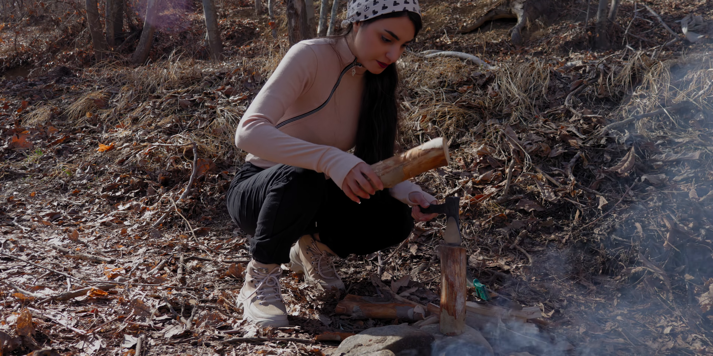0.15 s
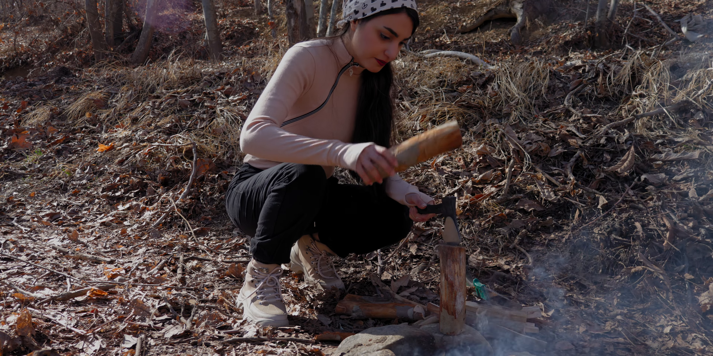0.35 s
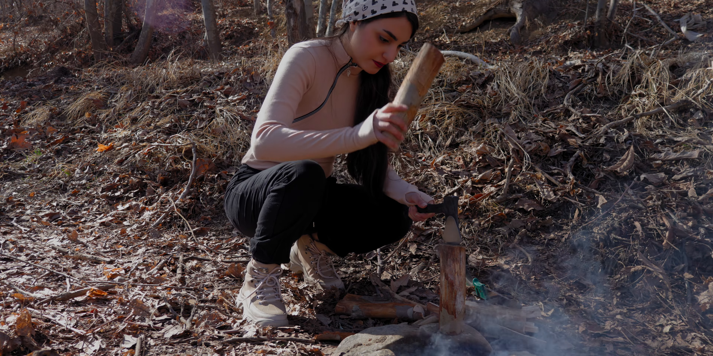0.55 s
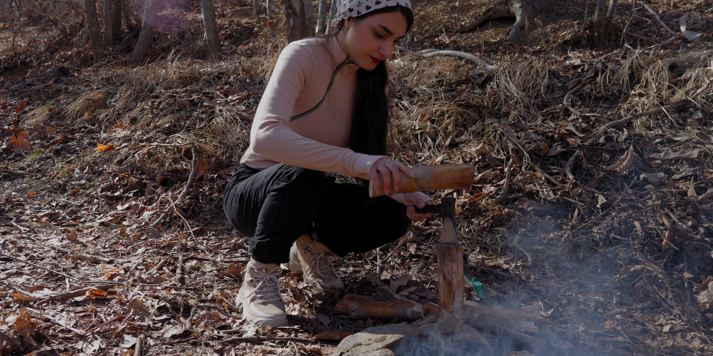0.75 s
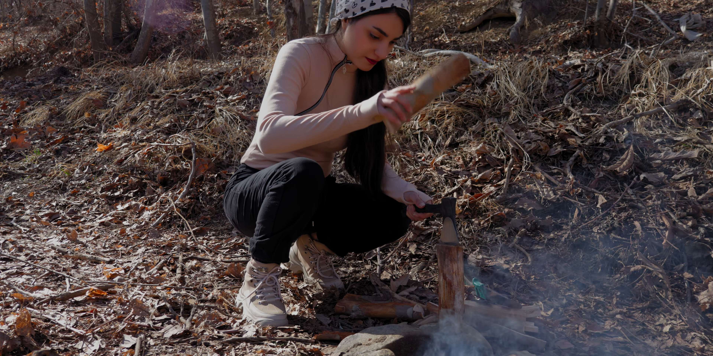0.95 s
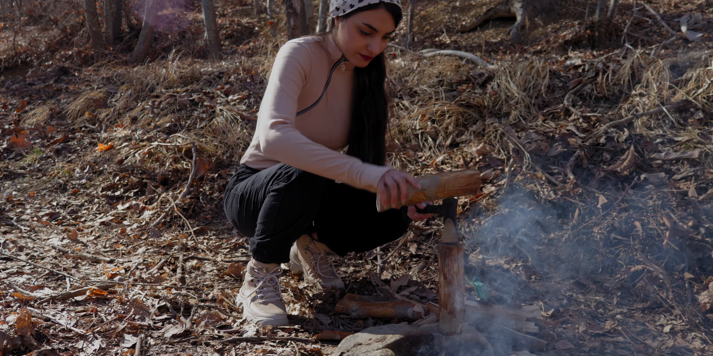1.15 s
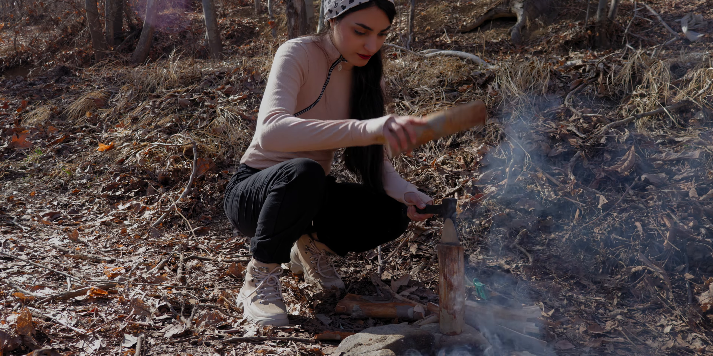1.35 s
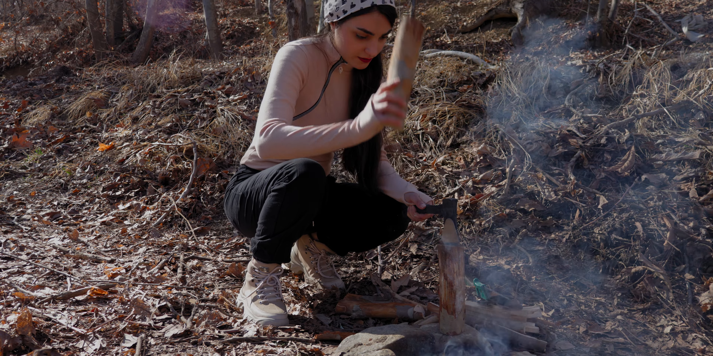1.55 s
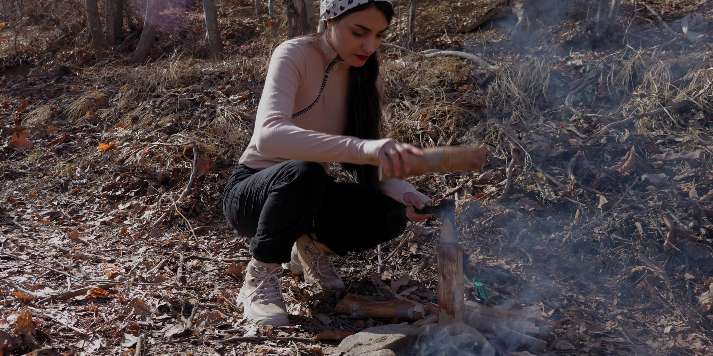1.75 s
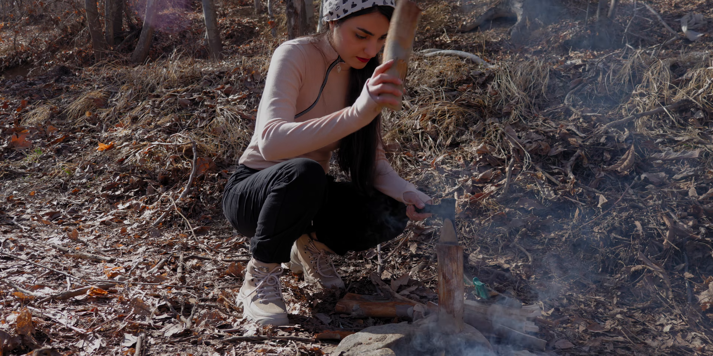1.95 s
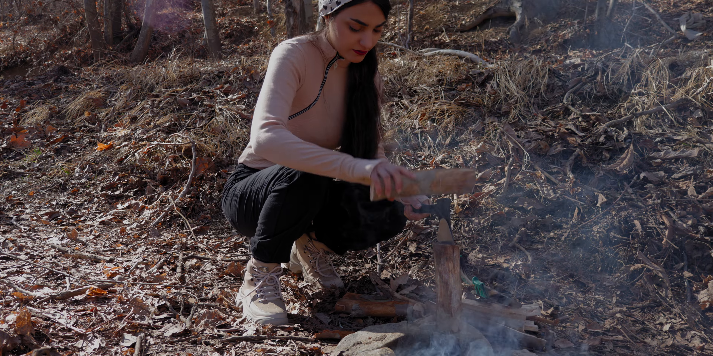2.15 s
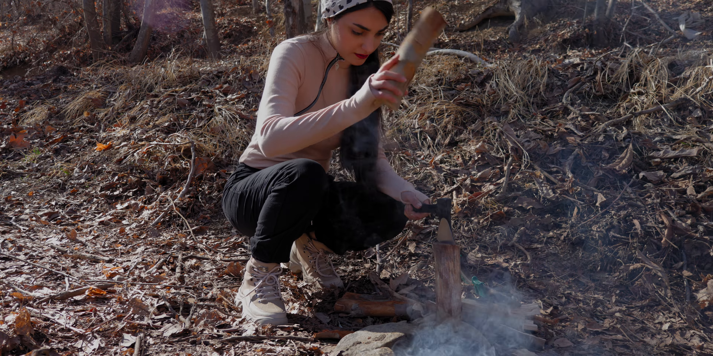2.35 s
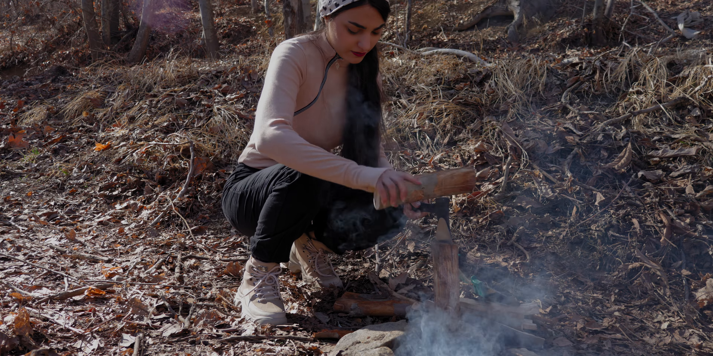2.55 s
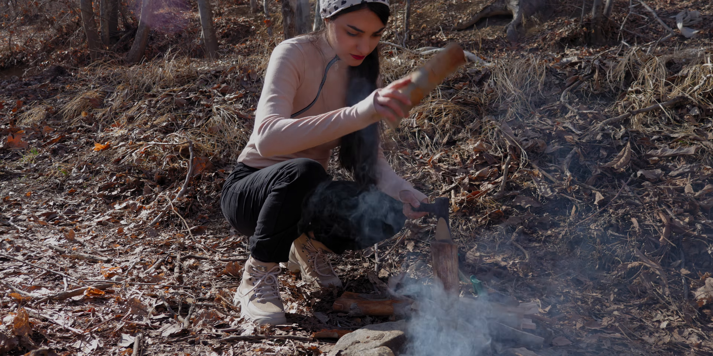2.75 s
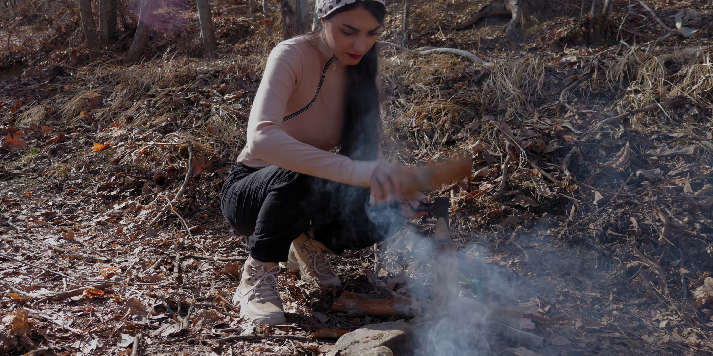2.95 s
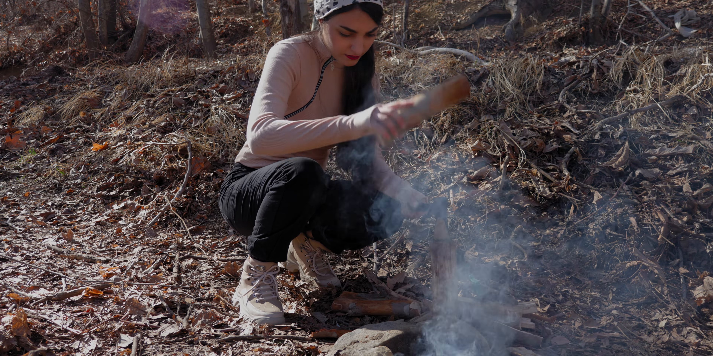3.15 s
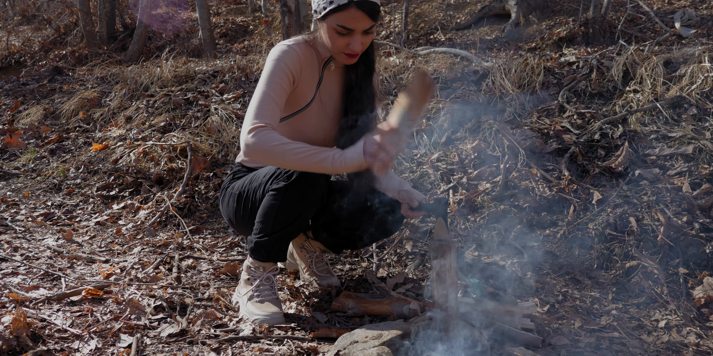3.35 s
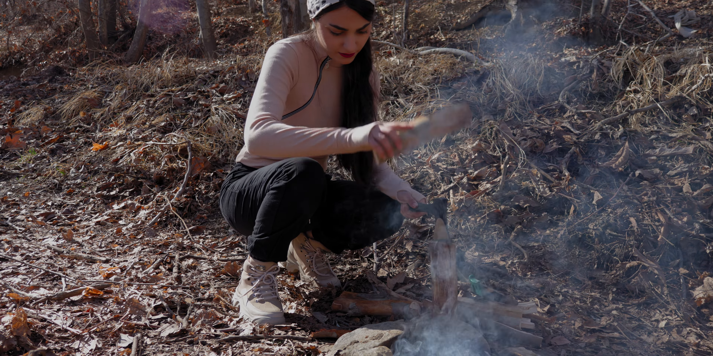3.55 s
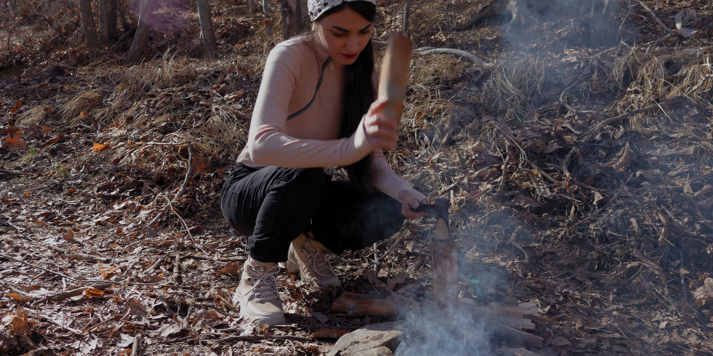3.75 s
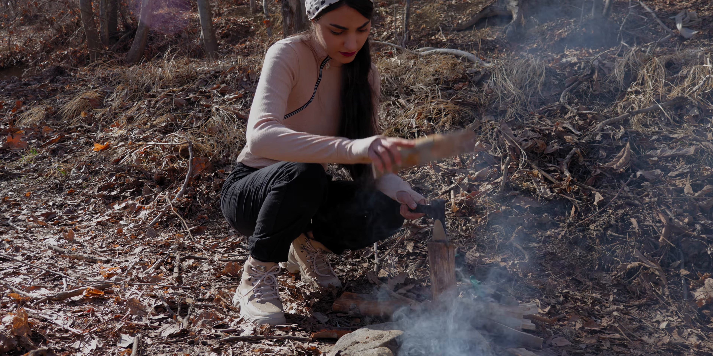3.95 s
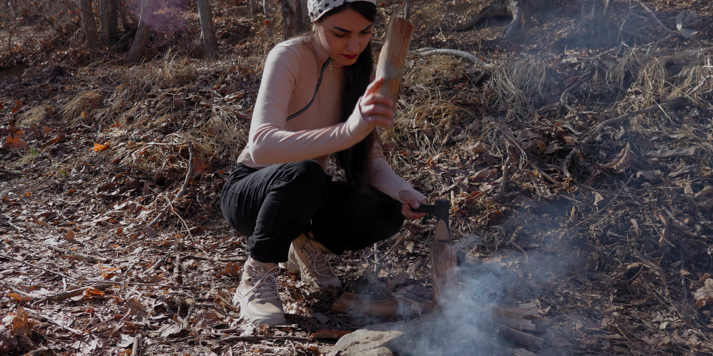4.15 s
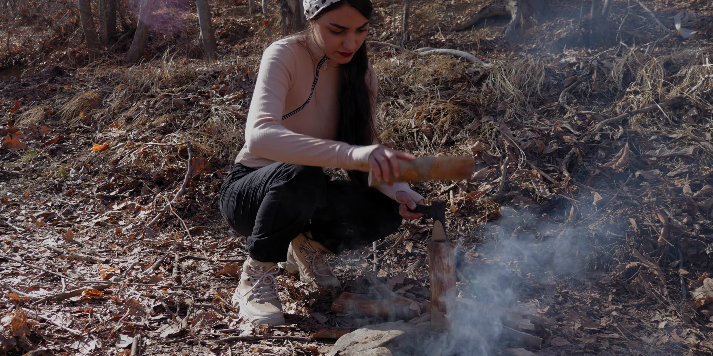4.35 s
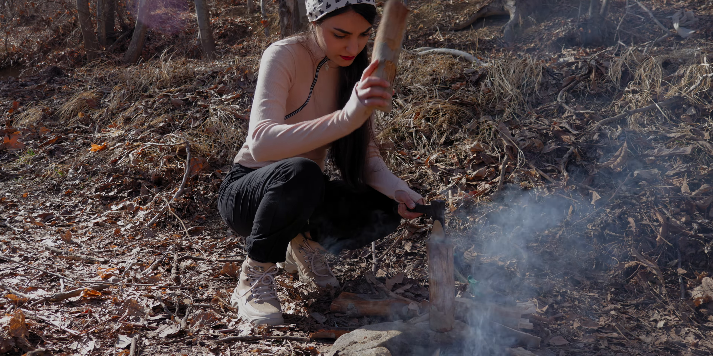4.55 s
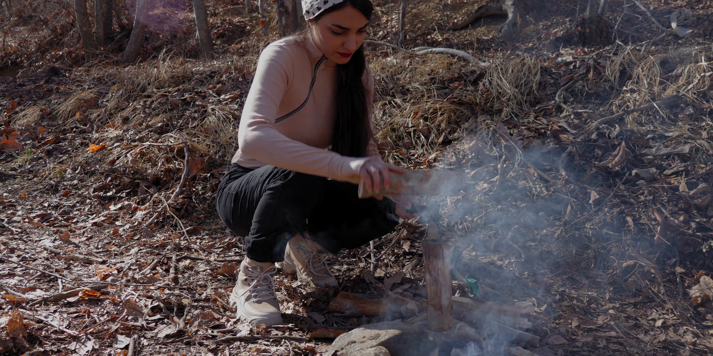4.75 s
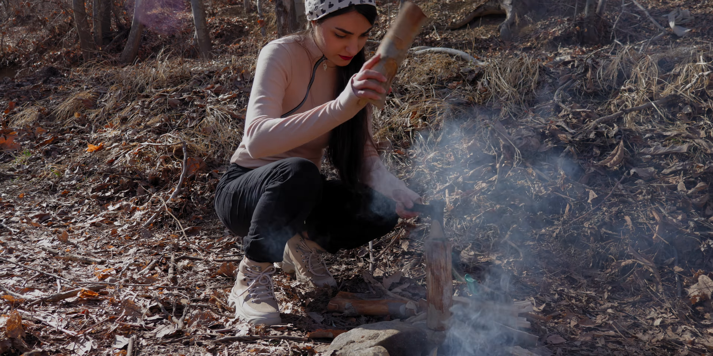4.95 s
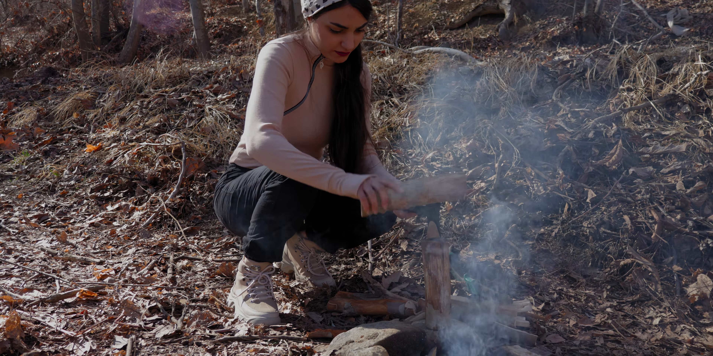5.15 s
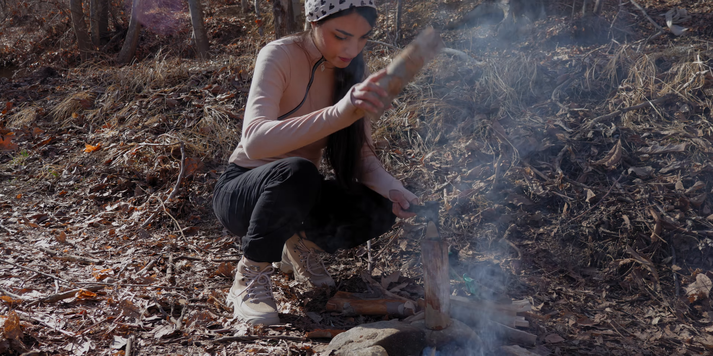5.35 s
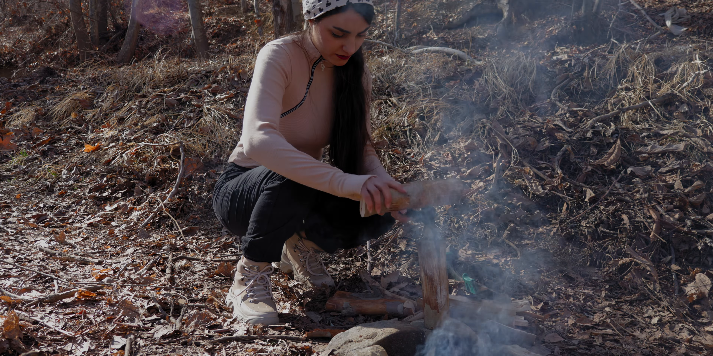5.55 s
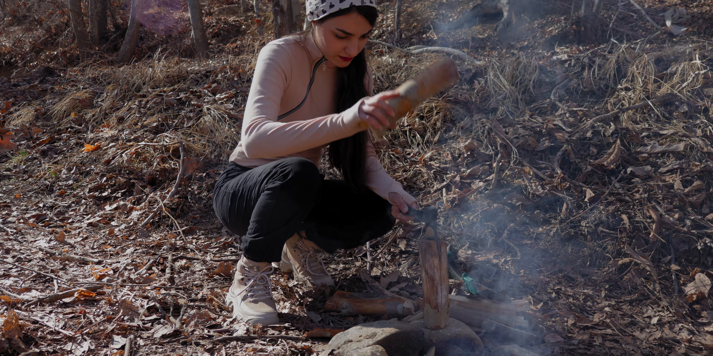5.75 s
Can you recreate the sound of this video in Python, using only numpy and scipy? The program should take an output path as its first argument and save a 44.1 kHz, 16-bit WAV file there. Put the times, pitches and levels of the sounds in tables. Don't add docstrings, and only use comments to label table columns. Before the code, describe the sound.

Outdoors in woodland, one close microphone. The first 0.75 s is quiet: faint leafy hiss with a slight rustle near 0.25, low wind, tiny high fire ticks and a barely audible touch at 0.2. Then a wooden club knocks a hatchet into a log at about 0.77, 1.27, 1.76, 2.2, 2.65, 3.09, 3.52, 3.95, 4.37, 4.8, 5.23 and 5.66. Each blow is an abrupt, dry, clipped crack: mid-pitched hard wood, a very short steel clink, splintering and a low thump, heaviest around 2.2 and 3.1-3.95. Tree trunks answer within a tenth of a second, followed by a faint diffuse tail lasting about a second. Soft dull rebounds follow the blows at 3.95 and 5.66. Fire ticks cluster at 2.4-3.2, clearest at 2.76, and return at 5.2-5.3. A very faint low hum climbs from 3.7 to 4.95. Wind buffeting peaks near 5.1 and stays stronger afterward.

```python
import sys
import numpy as np
from scipy import signal
from scipy.fft import rfft, irfft, next_fast_len
from scipy.io import wavfile
from scipy.ndimage import uniform_filter1d

SR = 44100
rng = np.random.default_rng(int(sys.argv[2]) if len(sys.argv) > 2 else 0)


def makeup_ratio(level_db):
    decades = np.asarray(level_db, float) / 20
    return 10 ** decades


def store_wav(level_fs):
    pcm = np.round(np.clip(np.atleast_2d(level_fs), -1, 1) * 32767)
    wavfile.write(sys.argv[1], SR, pcm.T.astype(np.int16))


N = 259749

# start_s, club_db, steel_db, splinter_db, thump_db (into the ground)
BLOWS = [(0.771, 1, -2, 3, -12), (1.271, -3.5, 1, 2, -24.5), (1.758, 3.5, 4.5, -2.5, 3.5),
         (2.203, 7, 8, 3.5, 9), (2.645, -0.5, -1, 2, 2.5), (3.086, 6, -3.5, 3.5, 7.5),
         (3.517, 5, 2.5, 3, 6.5), (3.946, 6, 3.5, 5.5, 11.5), (4.374, 4, 5.5, 6, 0),
         (4.796, 3, 5.5, -0.5, -3), (5.234, 2.5, -0.5, 9, -12.5), (5.661, -2, 1.5, 2.5, 0.5)]
# pitch_hz, microphone_db, t60_s, trees_db (sent towards the trees)
LOG_MODES = [(508, -0.5, 0.015, -3.5), (600, 1, 0.013, 2), (753.2, 8.5, 0.014, -30)]
THUMP_MODES = [(136, -18, 0.029, -21.5), (201, -15.5, 0.024, -33.5), (383, -2, 0.015, -13)]
GRAIN_MODES = [(959, 3.78, .015, 3.5), (1120, 4.5, 0.0096, -6)]
CLUB_MODES = [(1286.5, 0.5, 0.015, -7), (1459.5, 8.5, 0.014, 1.5), (1650, 1.5, 0.016, -10),
              (1989, -2.5, 0.014, 0.5)]
STEEL_MODES = [(2360, 2.5, 0.026, 3), (2360, -60, 0.098, -45), (4510, -1.5, 0.014, -5.5),
               (6250, -33.5, 0.029, -24)]
SPLINTER_MODES = [(2685, -6, 0.016, -3.5), (3602, -11, 0.015, -8.5), (4000, -7.5, 0.015, -1.5),
                  (5400, -5.5, 0.0033, 2.5), (6310, -19.5, 0.018, -14)]
# frequency_hz, level_db
SNAP_SPECTRUM = [(300, 3), (600, 11), (1000, 15.5), (1700, 4.5), (2600, 4.5), (3300, 2), (4500, -5),
                 (8000, -16)]
REBOUND_STARTS = [.203, 3.9927, 5.6797]
# level_db, pitch_hz, t60_s
REBOUNDS = [
    (-42, 300, .02),
    (-12.5, 437, 0.017),
    (-8.5, 500, 0.018),
]
# delay_s, level_db, centre_hz, width_hz
TRUNKS = [(0.018, -5, 2490, 2000), (0.04, -5, 1596, 400), (0.0513, -4.5, 2800, 800), (0.0708, 0, 1320, 550),
          (0.0723, -2, 4000, 900), (.087, -14, 1000, 395), (0.118, -28, 1500, 600)]
# frequency_hz, t60_s
FOREST_T60 = [(200, .5), (600, 0.81), (1500, 1.08), (3000, 0.7147), (6000, 0.58), (12000, 0.43)]
# frequency_hz, level_db
FOREST_COLOUR = [(150, -22), (400, -5.5), (1600, -2), (3200, -4), (5000, -8.5), (7500, -5.5),
                 (10000, -10.5), (16000, -30.5)]
# start_s, peak_db, centre_hz, width_hz
TICKS = [(.32, -58, 9400, 5000), (.382, -45, 9140, 4000), (0.637, -41.5, 8550, 5100),
         (2.414, -47, 8400, 2970), (2.547, -45, 5400, 1500), (2.6825, -46, 11100, 4000),
         (2.705, -38, 13000, 3000), (2.7612, -29.5, 9000, 4000), (2.89, -44, 6000, 2500),
         (3.026, -44, 5200, 600), (3.23, -50.5, 7700, 1000), (5.207, -30, 11700, 4000),
         (5.328, -44, 12200, 3000)]
# time_s, strength_db
WIND = [(0.0, -38.5), (0.29, -39.5), (0.7, -33.5), (1.02, -41), (1.4, -38.5), (2.13, -36), (2.43, -41.5),
        (2.92, -37), (3.3, -40.5), (3.69, -38), (4.46, -41), (4.75, -36), (4.98, -33.5), (5.11, -25.5),
        (5.24, -27), (5.45, -33), (5.8, -29), (5.89, -31.5)]
# frequency_hz, level_db (per Hz)
GUST_SPECTRUM = [(15, -7), (30, 8.5), (45, -7), (65, -11.5), (90, -10), (140, -34), (250, -68)]
FLUTTER_SPECTRUM = [(50, -19.5), (90, 5), (130, 4), (200, -1.5), (280, -9.5), (400, -14), (700, -42.5)]
LEAF_SPECTRUM = [(200, 0.5), (300, -3), (700, -3), (1500, -10), (2700, -14), (5500, -21), (10000, -24),
                 (16100, -15)]
# time_s, pitch_hz, level_db
HUM = [
    (3.7, 112, -54),
    (3.88, 120, -41.5),
    (4.15, 140, -48.5),
    (4.5, 144.7, -42.5),
    (4.68, 161.3, -45),
    (4.95, 161.3, -61.5),
]
# frequency_hz, level_db
MIC_TOP = [(9000, 1), (13000, -3.5), (15500, -12.5), (17000, -7.5), (19000, -40)]


def evened(x):
    return x / np.sqrt(np.mean(x ** 2) + 1e-20)


def fade(t, t60):
    return 1000. ** (-t / t60)


def read(points, hz):
    f, value = np.transpose(points)
    return np.interp(np.log(hz + 1), np.log(f + 1), value)


def over_time(rows, column):
    rows = np.array(rows)
    return np.interp(np.arange(N) / SR, rows[:, 0], rows[:, column])


def add(mix, start_s, sound):
    part = mix[round(start_s * SR):][:len(sound)]
    part += sound[:len(part)]


def colour(x, points):
    size = next_fast_len(len(x))
    gain = makeup_ratio(read(points, np.fft.rfftfreq(size, 1 / SR)))
    return irfft(rfft(x, size) * gain, size)[:len(x)]


def band(hz, centre_hz, width_hz):
    return np.exp(-.5 * ((hz - centre_hz) / width_hz) ** 2)


def noise(points, patchy_db, size):
    hop = size // 4
    hz = np.fft.rfftfreq(size, 1 / SR)
    real, imaginary, patches = rng.standard_normal((N // hop + 5, len(hz), 3)).T
    patches = uniform_filter1d(patches, size=9, axis=0)
    patches = evened(uniform_filter1d(patches, size=5, axis=1))
    spectra = (real + 1j * imaginary) * makeup_ratio(read(points, hz)[:, None] + patchy_db * patches)
    return evened(signal.istft(spectra, nperseg=size, noverlap=size - hop)[1][:N])


def ring(modes, db, t, spread_db=2.0, detune=0.0098, rise_s=0.000084, aside_t60=0.013):
    hz, near_db, t60, far_db = np.transpose(modes)[:, :, None]
    pitch, phase, size = rng.standard_normal((3, len(modes), 1))
    wave = np.sin(2 * np.pi * hz * (1 + detune * pitch) * t + .5 * phase)
    wave = wave * makeup_ratio(db + spread_db * size) * fade(t, t60) * (1 - np.exp(-t / rise_s))
    ahead = (wave * makeup_ratio(near_db)).sum(0)
    aside = (wave * makeup_ratio(far_db)).sum(0) * fade(t, aside_t60)
    return np.array([ahead, aside])


def log_ring(thump_db, t):
    return ring(LOG_MODES, 3, t) + ring(THUMP_MODES, thump_db, t) + ring(GRAIN_MODES, 5, t)


def steel_ring(steel_db, t):
    sing_db, sing_share = 4, 0.45
    steel = ring(STEEL_MODES, steel_db, t, spread_db=.5, detune=0.0028, rise_s=0.0025, aside_t60=0.035)
    return steel * makeup_ratio([[0], [sing_db - (1 - sing_share) * steel_db]])


def splitting(start_s, splinter_db, t):
    top_hz, top_s, sag_hz_per_s2 = 3150, 3.96, 33.5
    spray_db = 7.5
    split_hz = top_hz - sag_hz_per_s2 * (start_s - top_s) ** 2
    splinter = ring(SPLINTER_MODES + [(split_hz, -5, .018, -8)], splinter_db, t)
    crack = np.diff(rng.standard_normal(len(t) + 1))
    crack = crack * makeup_ratio(splinter_db - 6.0) * fade(t, 0.013)
    rasp = uniform_filter1d(rng.standard_normal(len(t)), size=3)
    rasp = rasp * makeup_ratio(splinter_db - 19.5) * fade(t, 0.045)
    return (splinter + crack + rasp) * makeup_ratio([[0], [spray_db]])


def blows():
    overload_db, wood_aside_db = 3.5, -10
    through_s, through_db = .0043, -14
    shallow_db, seated_s = -7, 0.62
    near, far, t = np.zeros(N), np.zeros(N), np.arange(8192) / SR
    contact = np.roll(t == 0, 64) * makeup_ratio(21.5)
    snap = np.roll(colour(contact, SNAP_SPECTRUM), -32)
    for start_s, club_db, steel_db, splinter_db, thump_db in BLOWS:
        log = log_ring(thump_db, t)
        club = ring(CLUB_MODES, club_db, t)
        splinter = splitting(start_s, splinter_db, t)
        lag = round(through_s * (1 + 0.025 * rng.standard_normal()) * SR)
        again = np.roll(log + makeup_ratio(-6.5) * (club + splinter), lag, axis=1)
        wood = log + club + splinter + makeup_ratio(through_db) * again
        ahead, aside = makeup_ratio([[0], [wood_aside_db]]) * wood + steel_ring(steel_db, t)
        aside = aside + snap
        carry_db = shallow_db * np.exp(-(start_s - BLOWS[0][0]) / seated_s)
        add(near, start_s, makeup_ratio(overload_db) * ahead)
        add(far, start_s, makeup_ratio(carry_db) * aside / np.linalg.norm(aside))
    return near, far


def rebounds():
    partials = [(.6, -5.5), (1, 3.5), (1.7, -5.5), (2.6, -8.5), (3.8, -12.5), (7.2, -30)]  # ratio, dB
    out, t = np.zeros(N), np.arange(3000) / SR
    for start_s, (db, hz, t60) in zip(REBOUND_STARTS, REBOUNDS):
        modes = [(ratio * hz, partial_db, t60, 0) for ratio, partial_db in partials]
        ahead, _ = ring(modes, db, t, spread_db=6.0, detune=0.0049, rise_s=0.00048)
        add(out, start_s, ahead)
    return out


def trunks(x):
    out, size = np.zeros(N), next_fast_len(N)
    spectrum, bins = rfft(x, size), np.fft.rfftfreq(size, 1 / SR)
    for delay_s, db, hz, width_hz in TRUNKS:
        add(out, delay_s, makeup_ratio(db) * irfft(spectrum * band(bins, hz, width_hz), size))
    return out


def scattered_tail(start_s=0.004, rise_s=0.024):
    taps, spacing = np.zeros(SR), 22
    at = np.arange(0, SR - spacing, spacing)
    at = at + rng.integers(0, spacing, len(at))
    taps[at] = rng.choice([-1., 1.], len(at)) * makeup_ratio(4.1 * rng.standard_normal(len(at)))
    hz, u, spectra = signal.stft(evened(taps), SR, nperseg=256)
    swell = 1 - np.exp(-np.maximum(u - start_s, 0) / rise_s)
    decay = fade(u, read(FOREST_T60, hz)[:, None])
    return signal.istft(spectra * swell * decay, SR, nperseg=256)[1]


def forest(x, tail_db=-30):
    out, t = trunks(x), np.arange(N) / SR
    for k in range(3):
        turn = np.sqrt(2 / 3) * np.cos(2 * np.pi * (t / 1.3 + k / 3))
        out += makeup_ratio(tail_db) * signal.fftconvolve(x * turn, scattered_tail())[:N]
    return colour(out, FOREST_COLOUR)


def fire(t60=0.0064):
    out, t = np.zeros(N), np.arange(800) / SR
    bins = np.fft.rfftfreq(len(t), 1 / SR)
    for start_s, db, hz, width_hz in TICKS:
        puff = irfft(rfft(rng.standard_normal(len(t))) * band(bins, hz, width_hz))
        add(out, start_s, makeup_ratio(db) * fade(t, t60) * evened(puff))
    return out


def wind():
    gust_db, flutter_db, calm_db = 1.5, -47.5, -38
    strength_db = over_time(WIND, column=1)
    gust = makeup_ratio(strength_db + gust_db) * noise(GUST_SPECTRUM, patchy_db=0.5, size=2048)
    flutter = noise(FLUTTER_SPECTRUM, patchy_db=2.5, size=1024)
    return gust + makeup_ratio(flutter_db + strength_db - calm_db) * flutter


def leaves():
    level_db, settle_db_per_s2 = -48.5, -0.0106
    rustle_s, rustle_length_s, rustle_db = .25, .07, 3
    t = np.arange(N) / SR
    db = level_db + settle_db_per_s2 * t ** 2 + rustle_db * band(t, rustle_s, rustle_length_s)
    return makeup_ratio(db) * noise(LEAF_SPECTRUM, patchy_db=0.63, size=512)


def hum():
    waver = 1 + .022 * evened(uniform_filter1d(rng.standard_normal(N), size=3000))
    phase = 2 * np.pi * np.cumsum(over_time(HUM, column=1) * waver) / SR
    return makeup_ratio(over_time(HUM, column=2)) * np.sin(phase)


def scene():
    near, far = blows()
    soft = rebounds()
    echoes = forest(far + 0.081 * soft)
    return (near + soft + echoes + fire() + wind() + leaves() + hum())[None]


def roll_off(x):
    return signal.sosfilt(signal.butter(12, 16260, fs=SR, output="sos"), x)


def record(dry):
    ceiling = .96
    clipped = np.clip(dry, -ceiling, ceiling)
    mix = np.array([colour(channel, MIC_TOP) for channel in clipped])
    return roll_off(mix)


dry = scene()
out = record(dry)
store_wav(out)
```